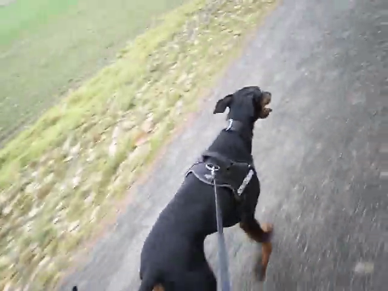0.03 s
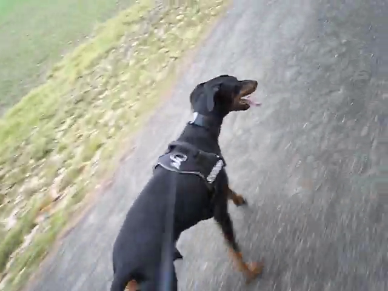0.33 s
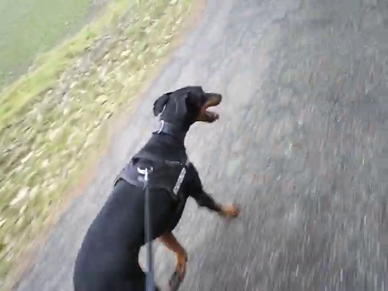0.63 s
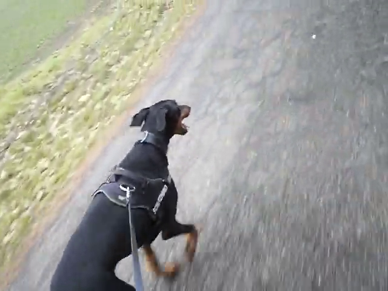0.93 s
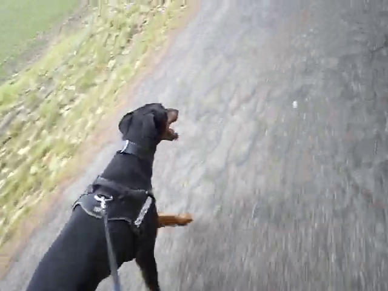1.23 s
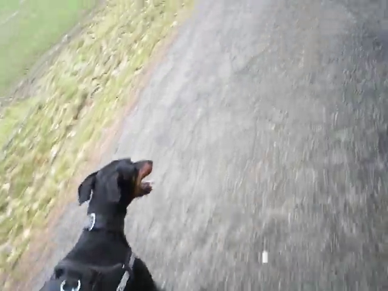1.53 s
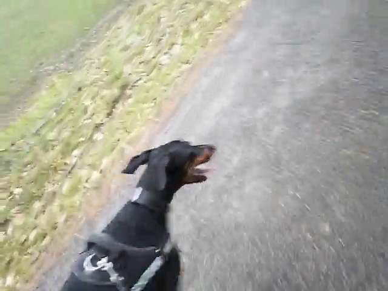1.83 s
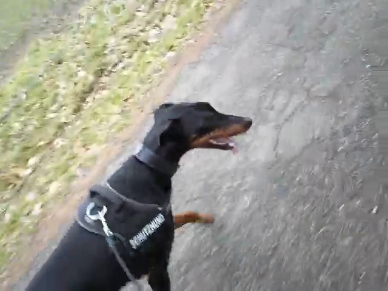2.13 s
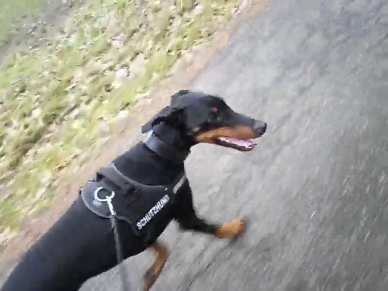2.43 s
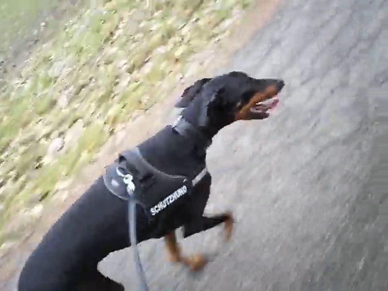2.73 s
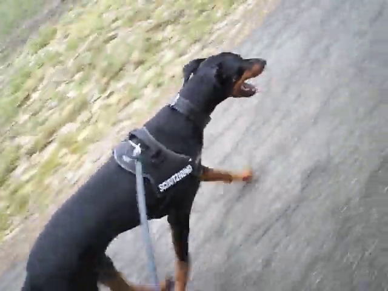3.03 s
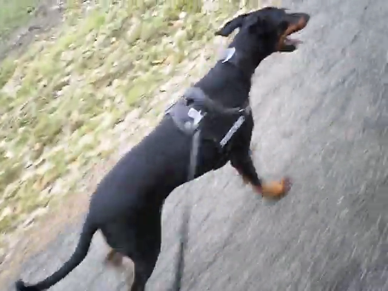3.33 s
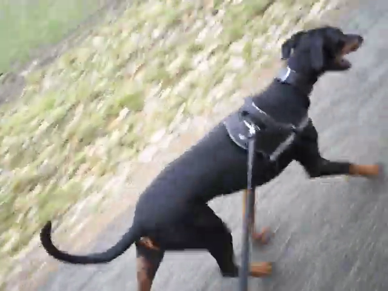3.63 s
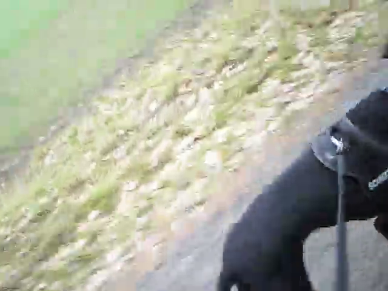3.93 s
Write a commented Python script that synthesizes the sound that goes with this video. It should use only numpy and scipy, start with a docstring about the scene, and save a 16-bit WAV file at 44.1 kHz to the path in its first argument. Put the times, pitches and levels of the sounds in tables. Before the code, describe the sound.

Wheels rolling on a gritty path, with ticks, wind and a loud knock at the end.

```python
"""Small wheels on asphalt

Small wheels roll along a path behind a trotting dog, with wind on the microphone. The rough surface
makes the frame rumble and rasp; grit ticks and snaps under the wheels, and one wheel chirps.
Near the end the frame rattles and takes one hard knock that overloads the narrow-band input."""
import sys
import numpy as np
from scipy import signal
from scipy.fft import rfft, irfft
from scipy.io import wavfile

SR = 44100
rng = np.random.default_rng(int(sys.argv[2]) if len(sys.argv) > 2 else 0)


def transcribe(u):
    """Save the signal u as a 16-bit wav file named by the first command-line argument.

    u: samples, shape (n,) or (channels, n), limited to [-1, 1]; the rate is SR.
    q: integer samples, one column per channel.
    """
    v = np.clip(np.atleast_2d(u).T, -1, 1)
    q = np.round(v * 32767).astype(np.int16)
    wavfile.write(sys.argv[1], SR, q)


N = 176400
T = np.arange(N) / SR

# Noise spectra. Each row: frequency in Hz, relative density in dB.
WIND_SPECTRUM = [(12, -6.5), (24, 0), (36, -6), (50, -14.5), (70, -2.5), (95, -15), (150, -20),
                 (400, -42.5)]
RUMBLE_SPECTRUM = [(50, -16), (90, -3), (130, -3.5), (185, -1.5), (260, -4), (335, -4), (420, -12),
                   (600, -24), (1200, -56.5)]
GRIT_SPECTRUM = [(400, -12), (900, -3), (1500, -5), (2200, -1), (2850, -3.5), (3400, 11), (4200, -6)]
BODY_SPECTRUM = [(250, -12.5), (450, -0.5), (560, -3.5), (630, -3), (760, 0), (825, -2), (870, 3),
                 (930, -0.5), (1000, 4), (1060, -7), (1130, -5), (1190, -6.5), (1270, -0.5), (1400, -4.5),
                 (1700, -11.5), (3000, -34.5)]
RASP_SPECTRUM = [(900, -28), (1450, -8.5), (1700, 1), (1950, 1), (2120, 4), (2290, -2.5), (2650, 0),
                 (2870, -7), (3100, -1.5), (3700, -2.5), (4200, -12.5)]
# Level curves. Each row: time in seconds, relative level in dB.
WIND_LEVELS = [(0, -45.5), (.4, -51.5), (1.1, -52), (1.5, -49), (1.83, -50.5), (1.97, -45.5), (2.2, -45),
               (2.85, -55), (2.96, -45.5), (3.05, -52.5), (3.6, -48.5), (4, -47)]
RUMBLE_LEVELS = [(0, -43.5), (.17, -44), (.33, -47.5), (.56, -42.5), (.72, -44), (.92, -43.5), (1.22, -47),
                 (1.42, -44.5), (1.62, -46.5), (2.1, -46), (2.23, -41.5), (2.36, -48.5), (2.9, -47),
                 (3.3, -48), (3.85, -47.5), (3.97, -45.5)]
GRIT_LEVELS = [(0, -47), (.4, -60.5), (1.8, -68), (2.05, -64), (2.25, -48.5), (2.5, -57), (3.2, -64),
               (4, -64)]
# Wheel drone. Each row: time in seconds, pitch in Hz, level in dB.
DRONE_CURVE = [(0, 134.4, -61.5), (.6, 138, -61), (.92, 138.1, -53.5), (1.15, 132, -60), (1.45, 123.9, -54),
               (1.8, 124.2, -53), (2.02, 120.5, -58), (2.25, 116.2, -61), (2.55, 117.2, -46.5),
               (2.75, 114.4, -59), (3.0, 115.3, -57), (3.4, 114, -59.5), (4, 115, -56)]
# Larger bits of grit. Each row: start in seconds, initial level in dB.
GRIT_SNAPS = [(0.453, -27), (.563, -41), (1.917, -28), (2.118, -26), (2.195, -35), (2.235, -43),
              (2.286, -28), (2.311, -31), (2.429, -32), (2.464, -28), (2.565, -27.5), (2.647, -33),
              (2.731, -30.5), (2.828, -29.5), (2.926, -31), (2.942, -32.5), (3.561, -31), (3.592, -30.5),
              (3.741, -28.5)]
# Rolling effort. Each row: time in seconds, body level in dB, relative rasp level in dB.
ROLL_LEVELS = [(0, -46.5, -49), (.13, -46.5, -49), (.3, -51, -50.5), (.42, -47.5, -54), (.51, -47, -52.5),
               (.72, -49.5, -51), (1.0, -50.5, -53), (1.38, -51, -53), (1.46, -47.5, -52), (1.63, -50, -54),
               (1.83, -53.5, -52.5), (2.03, -52, -55), (2.13, -46.5, -51), (2.27, -50.5, -53),
               (2.33, -52.5, -52.5), (2.6, -51.5, -52.5), (2.75, -53.5, -55), (3.2, -54, -53.5),
               (3.75, -51, -53.5)]
# Knocks on the frame. Each row: start in seconds, strength in dB, tilt in dB per octave,
# ring time factor, favoured frequency in Hz, its lift in dB.
FRAME_KNOCKS = [(.016, -33, -2, 1.4, 3050, 2.5), (.595, -38, -1.5, 0.37, 1270, 25),
                (2.236, -37, 1.5, 1, 900, 6), (2.548, -41.5, 2, 0.77, 1000, 9),
                (3.6915, -29.5, 3, 1.2, 2000, 4.5), (3.717, -43, 7.5, 0.66, 1400, 8),
                (3.7688, -35.5, 7, 0.47, 2010, 13), (3.8385, 2.5, -0.5, 0.98, 2300, 2),
                (3.932, -31, -2.5, 1.2, 1040, 18), (3.940, -27.5, -1.5, 1.3, 820, 16),
                (3.982, -37, -10, 0.74, 503, 7)]
# Frame modes. Each row: frequency in Hz, gain in dB, nominal T60 in seconds.
FRAME_MODES = [(291, -39, 0.24), (473, -27.5, 0.31), (530, -15, 0.034), (605, -8, 0.017), (720, -9, 0.036),
               (768, -7.5, 0.05), (899, -9.5, 0.039), (1020, -22, .04), (1149, -4.5, 0.032),
               (1410, -8, 0.03), (2005, -7, 0.017), (2292, 3, 0.0095), (2400, -8.5, 0.0052),
               (2710, -10.5, 0.026), (3020, 0.5, 0.011)]


def from_db(db):
    """Decibels to gain."""
    return 10 ** (np.asarray(db) / 20)


def curves(rows):
    """Each value column, interpolated per sample."""
    times_s, *columns = np.transpose(rows)
    return [np.interp(T, times_s, column) for column in columns]


def coloured(excitation, spectrum):
    """Excitation filtered by a spectrum; rms 1."""
    hz, db = np.transpose(spectrum)
    bins_hz = np.maximum(np.arange(N // 2 + 1) * SR / N, 1)
    gain = from_db(np.interp(np.log(bins_hz), np.log(hz), db))
    return unit_rms(irfft(rfft(excitation) * gain, N))


def unit_rms(x):
    """Scale to rms 1."""
    return x / np.sqrt(np.mean(x ** 2) + 1e-20)


def drift(rate_hz):
    """Low-passed random wander; rms 1."""
    bins_hz = np.arange(N // 2 + 1) * SR / N
    return unit_rms(irfft(rfft(rng.standard_normal(N)) / (1 + (bins_hz / rate_hz) ** 2), N))


def grains(per_s, spread_db):
    """Random clicks of uneven size and sign."""
    sizes = from_db(spread_db * np.minimum(rng.exponential(1, N), 4))
    return (rng.random(N) < per_s / SR) * sizes * rng.choice([-1, 1], N)


def ring(clicks, hz, t60_s):
    """Resonator: a unit click starts a decaying unit sine."""
    radius, step_rad = from_db(-60 / (t60_s * SR)), 2 * np.pi * hz / SR
    feedback = [1, -2 * radius * np.cos(step_rad), radius * radius]
    return signal.lfilter([0, np.sin(step_rad)], feedback, clicks + 1e-18)


def wind():
    """Lumpy buffeting on the microphone."""
    level_db, = curves(WIND_LEVELS)
    return from_db(level_db + 4 + 0.96 * drift(6)) * coloured(rng.standard_normal(N), WIND_SPECTRUM)


def rumble():
    """Bumps in the path make a low rumble."""
    level_db, = curves(RUMBLE_LEVELS)
    return from_db(level_db - 1 + 0.57 * drift(13)) * coloured(rng.standard_normal(N), RUMBLE_SPECTRUM)


def wheel_drone():
    """The wheels hum, wavering in pitch and level."""
    hz, level_db = curves(DRONE_CURVE)
    phase = 2 * np.pi * np.cumsum(hz * (1 + 0.0309 * drift(15.2))) / SR
    return from_db(level_db + 2.7 * drift(10)) * np.sqrt(2) * np.sin(phase)


def wheel_chirp(centre_s=3.485, hz=2070, half_width_s=0.0056, peak_db=-35.5):
    """A wheel squeaks for an instant."""
    envelope = from_db(peak_db) * np.exp(-((T - centre_s) / half_width_s) ** 2)
    phase = 2 * np.pi * np.cumsum(hz * (1 + 0.022 * drift(150))) / SR
    return envelope * np.sin(phase)


def grit_ticks():
    """Loose grit ticks under the wheels."""
    level_db, = curves(GRIT_LEVELS)
    return from_db(level_db) * coloured(grains(per_s=100, spread_db=5), GRIT_SPECTRUM)


def grit_snaps(t60_s=0.008):
    """Each crushed bit of grit gives a short crackle."""
    envelope = np.zeros(N)
    for start_s, db in GRIT_SNAPS:
        envelope += from_db(db - 60 * np.maximum(T - start_s, 0) / t60_s) * (T >= start_s)
    return envelope * coloured(rng.standard_normal(N), GRIT_SPECTRUM)


def rolling(swell_start_s=3.93, swell_rise_s=0.033, swell_db=-38.5):
    """Dense asphalt impacts shake the frame: a midrange body, and a rasp that swells at the end."""
    body_db, rasp_db = curves(ROLL_LEVELS)
    surface_db = drift(25)
    body = coloured(grains(per_s=2500, spread_db=2.5), BODY_SPECTRUM)
    rasp = coloured(grains(per_s=9000, spread_db=2), RASP_SPECTRUM)
    swell = from_db(swell_db) * np.clip((T - swell_start_s) / swell_rise_s, 0, 1)
    rasp_gain = from_db(rasp_db + 6 + surface_db) + swell
    return from_db(body_db + surface_db) * body + rasp_gain * rasp


def frame_knocks(chatter_db=-34, chatter_t60_s=0.018, lift_width_oct=0.14, radiation_cutoff_hz=258):
    """Each knock and its brief chatter ring the frame's modes; the spot struck favours some."""
    ringing, length = np.zeros(N + SR), SR // 2
    chatter_envelope = from_db(chatter_db - 60 * T[:length] / chatter_t60_s)
    for start_s, strength_db, tilt_db_per_oct, ring_factor, favoured_hz, lift_db in FRAME_KNOCKS:
        force = chatter_envelope * grains(per_s=1200, spread_db=6)[:length]
        force[0] = 1  # the knock itself
        start = int(start_s * SR)
        for hz, mode_db, t60_s in FRAME_MODES:
            tilt_db = tilt_db_per_oct * np.log2(hz / 1200)
            spot_db = lift_db * np.exp(-(np.log2(hz / favoured_hz) / lift_width_oct) ** 2)
            gain = from_db(strength_db + mode_db + tilt_db + spot_db)
            ringing[start:start + length] += gain * ring(force, hz, t60_s * ring_factor)
    highpass = signal.butter(1, radiation_cutoff_hz, "high", fs=SR, output="sos")
    return signal.sosfilt(highpass, ringing[:N])


def scene():
    """One microphone feeds both channels."""
    mono = rolling() + grit_ticks() + wheel_drone() + rumble() + wind()
    mono += frame_knocks() + grit_snaps() + wheel_chirp()
    return np.tile(mono, (2, 1))


def record(dry, input_limit=1.1, band_hz=3800, left_lag_s=0.000125, cutoff_hz=15500):
    """Input overload, band limit, left-channel lag, second clip, final low-pass."""
    band_filter = signal.ellip(10, 0.3, 80, band_hz, fs=SR, output="sos")
    left, right = signal.sosfilt(band_filter, np.clip(dry, -input_limit, input_limit))
    stereo = np.array([np.interp(T - left_lag_s, T, left), right])
    lowpass = signal.cheby2(12, 70, cutoff_hz, fs=SR, output="sos")
    return signal.sosfilt(lowpass, np.clip(stereo, -1, 1))


dry = scene()
out = record(dry)
transcribe(out)
```